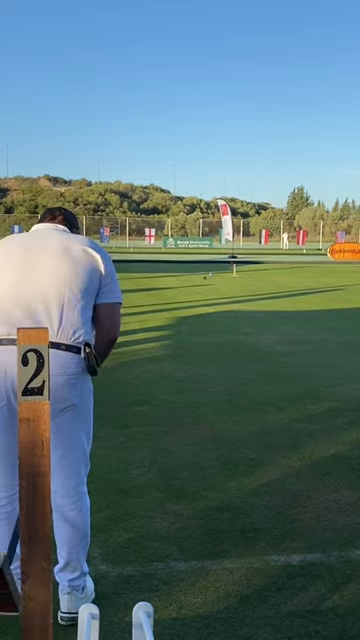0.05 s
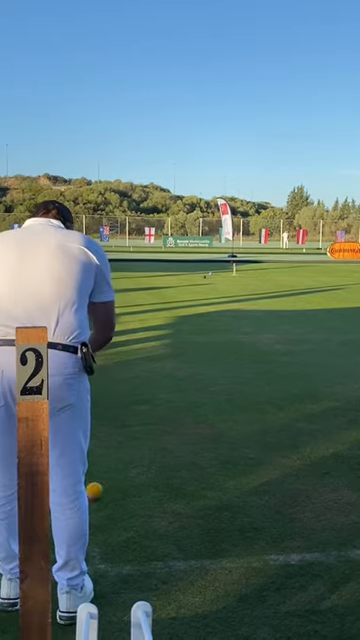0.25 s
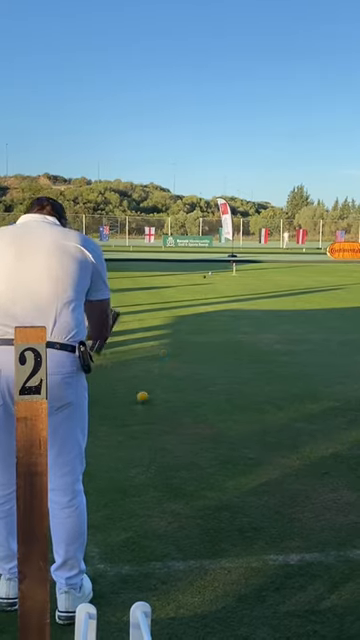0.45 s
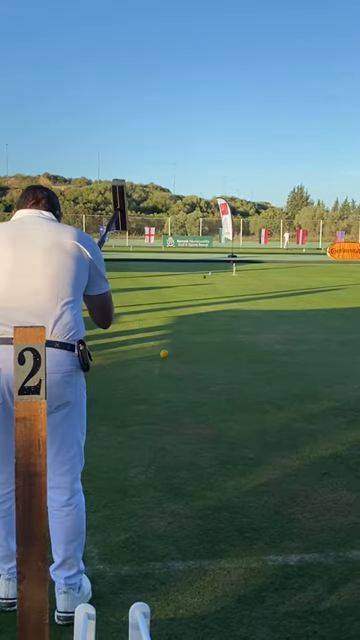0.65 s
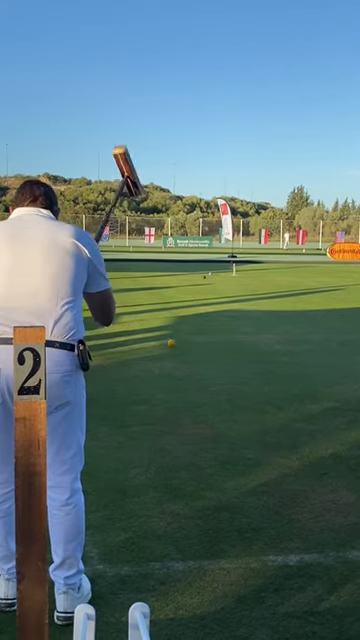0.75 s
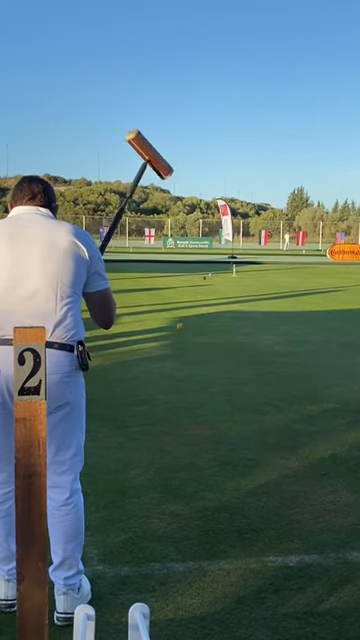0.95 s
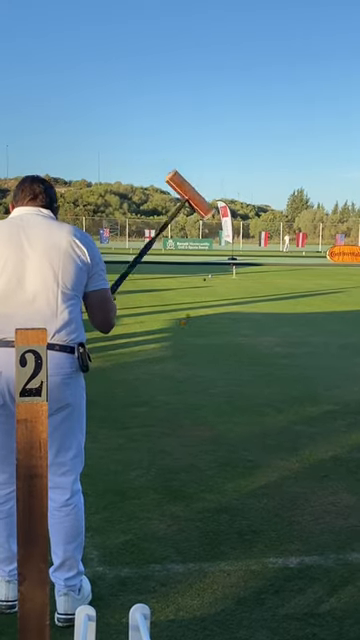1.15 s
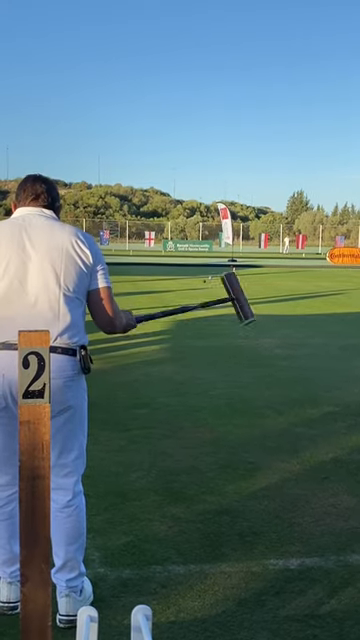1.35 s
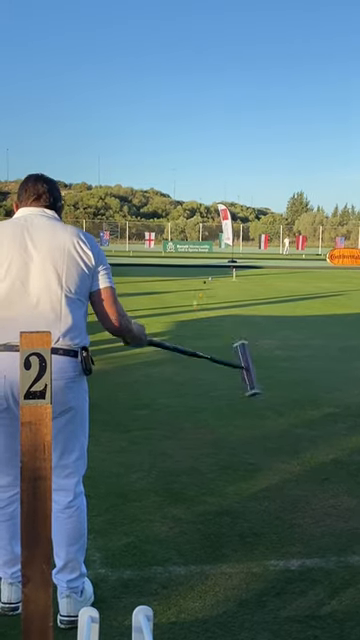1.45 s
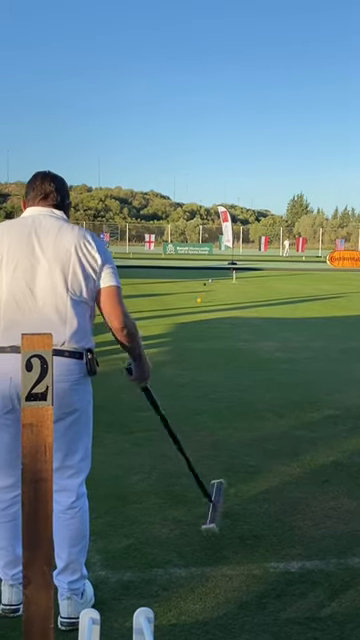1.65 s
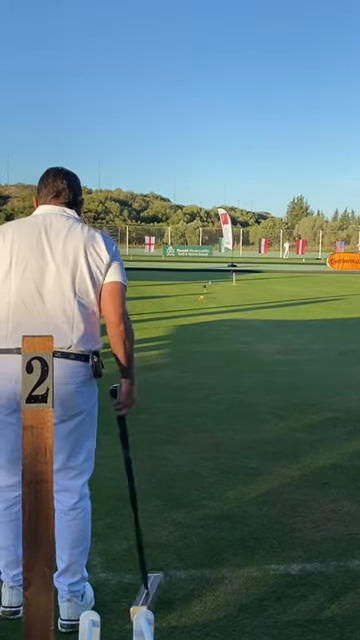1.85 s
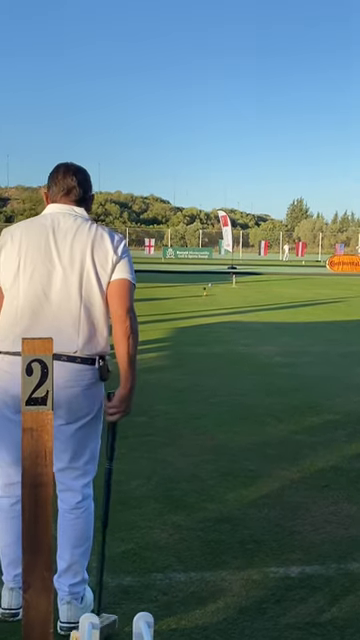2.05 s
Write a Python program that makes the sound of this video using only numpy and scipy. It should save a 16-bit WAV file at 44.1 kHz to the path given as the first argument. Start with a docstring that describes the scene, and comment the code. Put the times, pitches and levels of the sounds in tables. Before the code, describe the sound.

One sharp, woody mallet knock on a lawn over low breeze rumble, ending in a faint scrape.

```python
"""Low rumble and breeze run throughout, as octave bands of flickering noise with gusts.
A mallet cracks on a croquet ball: swelling modes, a burst of noise, slap echoes and a scattered tail.
The ball then skims off in brushes of grass noise and snapping stems; a bird chirps in scooped whistles.
Last, the mallet head drags on the turf: gritty scuffs, sliding hiss, narrow rings and more snaps.
A two-port microphone shifts the treble phase, ducks its gain after loud peaks and cuts the top."""
import sys
import numpy as np
from scipy import signal
from scipy.fft import rfft, irfft
from scipy.io import wavfile
from scipy.ndimage import uniform_filter1d

SR = 44100
rng = np.random.default_rng(int(sys.argv[2]) if len(sys.argv) > 2 else 0)


def dump(signal):
    """Clip the signal to [-1, 1] and save it as 16-bit WAV at the path in sys.argv[1]."""
    limited = np.clip(np.atleast_2d(signal).T, -1, 1)
    pcm = np.round(limited * 32767).astype(np.int16)
    wavfile.write(sys.argv[1], SR, pcm)


N = 92610


def amp(db):
    """Decibels to gain."""
    return 10 ** (np.asarray(db) / 20)


def rms_one(x):
    """Scale to unit rms."""
    return x / np.sqrt(np.mean(x ** 2) + 1e-20)


def at_hz(points, hz):
    """Interpolate a table on a log-frequency axis."""
    table_hz, values = np.transpose(points)
    return np.interp(np.log(hz), np.log(table_hz), values)


def since(start_s):
    """Seconds after a moment, zero before it."""
    return np.maximum(np.arange(N) / SR - start_s, 0)


def dying(start_s, t60_s):
    """Sudden start, exponential decay of 60 dB per t60_s."""
    t = since(start_s)
    return (t > 0) * amp(-60 * t / t60_s)


def swells(rows):
    """Sum of bell-shaped levels, each with its own rise and fall."""
    t = np.arange(N) / SR
    out = 0
    for peak_s, db, rise_s, fall_s in rows:
        width_s = np.where(t < peak_s, rise_s, fall_s)
        out = out + amp(db) * np.exp(-((t - peak_s) / width_s) ** 2)
    return out


def drift(corner_hz):
    """Slow random wander of spread 1: two-pole lowpassed noise, computed every 40 samples."""
    step = 40
    r = np.exp(-2 * np.pi * corner_hz * step / SR)
    white = rng.standard_normal(N // step + 2002)
    slow = signal.lfilter([1], [1, -2 * r, r * r], white)[2000:]  # skip the filter's settling
    return np.interp(np.arange(N) / step, np.arange(len(slow)), rms_one(slow))


# Left-right correlation of noise. Each row: frequency in Hz, correlation (1 = identical).
LIKENESS = [(60, 1), (130, 1), (250, 0.99), (450, .85), (800, 0.087), (1400, 0.58), (2500, 0.99),
            (4500, 0.95), (7000, 0.86), (15000, .93)]


def noise(spectrum, patchy_db):
    """Stereo noise in overlapping octave bands, each flickering by itself; rms 1."""
    hz = np.arange(N // 2 + 1) * SR / N + 1
    low_hz, high_hz = spectrum[0][0], spectrum[-1][0]
    inside = (hz > low_hz) & (hz < high_hz)
    mid, side = rfft(rng.standard_normal((2, N))) * amp(at_hz(spectrum, hz)) * inside
    alike = np.clip(at_hz(LIKENESS, hz), 0, 1)
    pair = np.sqrt(1 + alike) * mid + np.sqrt(1 - alike) * side * [[1], [-1]]
    out = 0
    for octave in np.arange(np.floor(np.log2(low_hz)), 15):
        band = np.clip(1 - np.abs(np.log2(hz) - octave), 0, 1)
        out = out + irfft(pair * band, N) * amp(patchy_db * drift(15))
    return rms_one(out)


def smear(hz, width_hz):
    """Bandpassed noise around a pitch, identical in both channels; rms 1."""
    edges_hz = [hz - width_hz / 2, hz + width_hz / 2]
    sos = signal.butter(2, edges_hz, "band", fs=SR, output="sos")
    return rms_one(signal.sosfilt(sos, rng.standard_normal(N)))


# Rumble and breeze colour. Each row: frequency in Hz, relative density in dB per Hz.
AIR_COLOUR = [(15, -57), (25, -31.5), (54, -6), (105, 0), (190, -12), (280, -21.5), (400, -16),
              (520, -16.5), (650, -22.5), (760, -28.5), (930, -31.5), (1150, -34), (2200, -52),
              (3300, -62.5), (5000, -66.5), (7400, -73.5), (10000, -73.5), (13000, -77), (15800, -90)]
# Rumble and breeze level. Each row: time in seconds, level in dB.
AIR_LEVEL = [(0, -37.5), (0.551, -38.5), (0.701, -39), (0.901, -37.5), (1.3, -39.5), (1.699, -38),
             (2.05, -36.5)]
# Gust colour, low middle. Each row: frequency in Hz, relative density in dB per Hz.
GUST_COLOUR = [(280, -7), (400, 1), (520, -1.5), (680, -9)]
# Gusts. Each row: peak time in seconds, level in dB, rise in seconds, fall in seconds.
GUSTS = [(.45, -58, .08, 0.14), (.92, -56.5, 0.13, 0.18), (1.86, -53.5, .04, 0.088)]


def air():
    """Far rumble and breeze as broadband noise of wandering level, plus swelling gusts."""
    level_db = np.interp(np.arange(N) / SR, *np.transpose(AIR_LEVEL))
    steady = amp(level_db) * noise(AIR_COLOUR, patchy_db=2.0)
    return steady + swells(GUSTS) * noise(GUST_COLOUR, patchy_db=1.0)


# Modes of mallet head and ball together.
# Each row: frequency in Hz, level in dB, time to peak in seconds, left over right in dB.
KNOCK_MODES = [(137, -22, 0.0048, 2.5), (270.8, -5, 0.0026, 1), (490, -21.5, 0.0042, 2.5),
               (835, -2.5, 0.0021, 2.5), (1176, -12.5, 0.0018, 3), (1468, -6.5, 0.0015, 3.5),
               (1946, -10, 0.0011, 2), (2970, -37.5, 0.0013, 1.5), (3670, -23, .0012, 0.5),
               (4640, -28.5, 0.0011, -4), (5687, -22, 0.0011, 1), (6560, -25, 0.0009, 2),
               (8490, -28, .001, 0.5), (10290, -28.5, 0.00054, 4.5), (11700, -31, 0.0006, 0),
               (14260, -36.5, .0007, 1)]
LAG_CYCLES = 0.96  # onset lag in the mode's own cycles: lower modes enter later
BRIGHT_FROM_HZ, BRIGHT_LAG_S = 3000, 0.00055  # extra onset lag of all modes above 3 kHz


def knock(start_s):
    """Each mode swells and dies on its own time scale, after its own lag."""
    out = 0
    for hz, db, peak_s, pan_db in KNOCK_MODES:
        lag_s = LAG_CYCLES / hz + BRIGHT_LAG_S * (hz > BRIGHT_FROM_HZ)
        t = since(start_s + lag_s)
        shape = (t / peak_s * np.exp(1 - t / peak_s)) ** 3
        sides = amp([[db + pan_db / 2], [db - pan_db / 2]])
        out = out + sides * shape * np.sin(2 * np.pi * hz * t)
    return out


HIT_S, HIT_DB = 0.2243, -1
# Slap echoes from fences and sheds. Each row: delay in seconds, level in dB, low cut in Hz.
SLAPS = [(.010, -29, 2500), (.021, -23, 3200), (.051, -43, 593), (0.118, -36, 900), (0.286, -42.5, 510)]


def blow():
    """The direct knock and its high-passed delayed copies."""
    out = knock(HIT_S)
    for delay_s, db, low_cut_hz in SLAPS:
        sos = signal.butter(2, low_cut_hz, "high", fs=SR, output="sos")
        out = out + signal.sosfilt(sos, amp(db) * knock(HIT_S + delay_s))
    return amp(HIT_DB) * out


# Bright noisy part of the crack, about 1 ms long, just after its start.
# Each row: peak time in seconds, level in dB, rise in seconds, fall in seconds.
CRACK_NOISE = [(.226, -32.5, 0.00082, 0.00055)]
# Crack noise colour. Each row: frequency in Hz, relative density in dB per Hz.
CRACK_NOISE_COLOUR = [(1000, -5.5), (2500, -13.5), (6000, -5), (9000, -6.5), (13000, -9), (15800, -15.5)]


def crack_noise():
    """The noisy part of the crack as a very short swell of bright noise."""
    return swells(CRACK_NOISE) * noise(CRACK_NOISE_COLOUR, patchy_db=1.5)


SCATTER_DB, SCATTER_T60_S = -34, 0.3
SCATTER_FAR_DB, SCATTER_FAR_T60_S = -46.5, 0.95
# Scatter colour. Each row: frequency in Hz, relative density in dB per Hz.
SCATTER_COLOUR = [(400, -29), (800, 0), (1200, -6), (2200, -10.5), (2950, -21.5), (3750, -16.5),
                  (4300, -19), (5600, -20.5), (7500, -28.5), (10000, -25.5), (13000, -30), (15800, -46.5)]
# Broad late returns from the hedge line.
# Each row: peak time in seconds, level in dB, rise in seconds, fall in seconds.
RETURNS = [(.238, -42.5, .008, .01), (.275, -45.5, .022, 0.011)]


def scatter():
    """Diffuse return of the crack: noise under a fast and a slow decay, plus hedge swells."""
    near = amp(SCATTER_DB) * dying(HIT_S, SCATTER_T60_S)
    far = amp(SCATTER_FAR_DB) * dying(HIT_S, SCATTER_FAR_T60_S)
    flicker = amp(1.2 * drift(150))
    return (near + far + swells(RETURNS)) * flicker * noise(SCATTER_COLOUR, patchy_db=3.5)


# Ball brushing the grass.
# Each row: peak time in seconds, level in dB, rise in seconds, fall in seconds.
HOPS = [(.39, -56.5, 0.022, 0.012), (.442, -59, .006, .01), (.458, -56, .008, 0.0089),
        (.511, -53.5, 0.015, 0.011), (.53, -69, 0.029, .014), (.6, -65, 0.015, 0.012),
        (.42, -67, 0.036, 0.041), (.765, -72.5, 0.016, .014)]
# Grass colour. Each row: frequency in Hz, relative density in dB per Hz.
GRASS_COLOUR = [(900, -27.5), (1500, -19), (2700, -3), (4800, 2), (6000, -4), (7500, -8.5), (10700, -6.5),
                (13500, -10), (15800, -15)]


def ball_hops():
    """Each brush is a short flickering swell of bright noise."""
    return swells(HOPS) * amp(2.0 * drift(200)) * noise(GRASS_COLOUR, patchy_db=-1.0)


# Stems under ball and mallet head. Each row: start in seconds, level in dB, pitch in Hz.
STEMS = [(.457, -42.5, 5060), (0.507, -43, 5600), (.5145, -52, 4100), (.516, -40, 3200), (.534, -46, 3200),
         (.609, -60, 4900), (1.557, -63.5, 11000), (1.572, -62, 4700), (1.693, -57, 2300),
         (1.717, -53, 2440), (1.748, -51.5, 2880), (1.851, -45.5, 2800), (1.861, -41.5, 1280),
         (1.862, -52, 2470), (1.872, -39, 2780), (1.876, -43.5, 1400), (1.876, -55, 4700),
         (1.892, -50, 5200), (1.896, -47, 2300), (1.9, -48, 1360), (1.912, -44, 2680), (1.929, -48, 2480),
         (1.853, -49, 5000), (1.884, -50, 3300), (1.947, -56, 4770), (1.952, -61, 2700), (1.999, -60, 3500),
         (2.004, -55.5, 2600), (2.037, -64, 6000)]
STEM_T60_CYCLES = 18


def stem_snaps():
    """Each stem rings as a sine that loses 60 dB in a fixed count of cycles."""
    out = 0
    for start_s, db, hz in STEMS:
        ring = np.sin(2 * np.pi * hz * since(start_s))
        out = out + amp(db) * dying(start_s, STEM_T60_CYCLES / hz) * ring
    return out


# Chirps. Each row: start in seconds, level in dB, whistle offset from it in dB,
# initial drop below pitch in Hz.
CHIRPS = [(.465, -65, -1, 98.7), (.49, -68, -3, 100), (1.025, -75, 1, 400), (1.044, -66, 0.5, 501),
          (1.539, -76, -16, 100), (1.676, -72.5, -7, 593), (1.692, -66, -1.5, 149.5)]
CHIRP_HZ, CHIRP_SCOOP_S, CHIRP_S, CHIRP_ROUGH_DB = 4680, 0.007, 0.032, 3.5
CHIRP_ECHO_DB, CHIRP_ECHO_T60_S, CHIRP_ECHO_WIDTH_HZ = -4, 0.38, 280
CHIRP_RASP_DB, CHIRP_RASP_WIDTH_HZ = -3, 1700  # wide hoarse halo, relative to the narrow echo


def bird():
    """A whistle scoops up to its pitch; narrow and wide noise bands hang on as its echo."""
    hang = smear(CHIRP_HZ, CHIRP_ECHO_WIDTH_HZ)
    hang = hang + amp(CHIRP_RASP_DB) * smear(CHIRP_HZ, CHIRP_RASP_WIDTH_HZ)
    out = 0
    for start_s, db, clear_db, scoop_hz in CHIRPS:
        t = since(start_s)
        progress = np.minimum(t / CHIRP_S, 1)
        hz = CHIRP_HZ - scoop_hz * np.exp(-t / CHIRP_SCOOP_S)
        note = np.sin(np.pi * progress) * np.sin(2 * np.pi * np.cumsum(hz) / SR)
        whistle = amp(db + clear_db + CHIRP_ROUGH_DB * drift(90)) * note
        echo = amp(db + CHIRP_ECHO_DB) * dying(start_s, CHIRP_ECHO_T60_S) * progress
        out = out + whistle + echo * hang
    return out


GRIT_PER_S, GRIT_SPREAD_DB, GRIT_SHARE = 700, 3.5, 0.5


def gritty(rows):
    """Brush envelope roughened by sparse uneven grains: blades snapping and grit."""
    hits = rng.random(N) < GRIT_PER_S / SR
    grains = hits * amp(GRIT_SPREAD_DB * np.minimum(rng.exponential(1, N), 4))
    grains = rms_one(uniform_filter1d(grains, size=80))  # about 2 ms each
    return swells(rows) * (1 - GRIT_SHARE + GRIT_SHARE * grains)


# Mallet head and shoes scuffing the turf.
# Each row: peak time in seconds, level in dB, rise in seconds, fall in seconds.
SCUFFS = [(1.556, -69, .004, 0.0092), (1.72, -70, 0.023, 0.054), (1.75, -71, 0.016, 0.011),
          (1.852, -55.5, 0.022, 0.012), (1.878, -50.5, 0.02, 0.026), (1.92, -60, 0.012, 0.045),
          (1.985, -65, 0.024, 0.066)]
# Turf colour. Each row: frequency in Hz, relative density in dB per Hz.
TURF_COLOUR = [(200, -4.5), (400, -16), (750, -3), (1000, -13), (1300, -1.5), (1900, -10.5), (2500, -3.5),
               (2850, -9), (3200, -6.5), (3900, -22), (4750, -22), (5500, -23), (7400, -28.5), (10000, -28),
               (13000, -28), (15800, -34)]


def turf_scuffs():
    """Scuffs as noise in the turf colour under gritty swells."""
    return gritty(SCUFFS) * noise(TURF_COLOUR, patchy_db=-0.5)


# Narrow rings of the dragged head. Each row: pitch in Hz, width in Hz, list of swells;
# each swell: peak time in seconds, level in dB, rise in seconds, fall in seconds.
DRAG_RINGS = [(2430, 300, [(1.72, -66, 0.04, 0.043), (1.87, -61.5, .025, 0.065), (1.96, -66, 0.014, 0.021),
              (2.01, -67.5, 0.0061, 0.022)]), (1038, 90, [(1.93, -56.5, 0.038, 0.028)]),
              (4650, 1200, [(1.86, -62.5, 0.014, 0.036), (1.96, -77, .015, 0.046)])]


def drag_rings():
    """The dragged head rings as swelling narrow bands of noise."""
    return sum(swells(rows) * smear(hz, width_hz) for hz, width_hz, rows in DRAG_RINGS)


# Grass sliding under the head.
# Each row: peak time in seconds, level in dB, rise in seconds, fall in seconds.
SLIDES = [(1.73, -76, .03, 0.027), (1.88, -62, 0.016, 0.022), (1.96, -74, 0.046, 0.065),
          (2.03, -87, 0.013, .03)]


def grass_slides():
    """Broad bright hiss in the grass colour under gritty swells."""
    return gritty(SLIDES) * noise(GRASS_COLOUR, patchy_db=3.0)


def scene():
    """Sum of all sources, in stereo."""
    crack = blow() + crack_noise() + scatter()
    ball = ball_hops() + stem_snaps()
    drag = turf_scuffs() + drag_rings() + grass_slides()
    return air() + crack + ball + bird() + drag


# Left port's lead over the right. Each row: frequency in Hz, phase in radians.
PORT_LEAD = [(300, 0), (1600, .35), (4600, .6), (7400, 3.14), (10300, 6.28), (13600, 9.42), (16300, 12.4)]


def two_ports(dry):
    """Delay the right channel's phase by a frequency-dependent angle."""
    lead_rad = np.interp(np.arange(N // 2 + 1) * SR / N, *np.transpose(PORT_LEAD))
    right = irfft(rfft(dry[1]) * np.exp(-1j * lead_rad), N)
    return np.stack([dry[0], right])


DUCK_FROM_DB, DUCK_SHARE = -19, 0.63  # threshold; dB of cut per dB over
DUCK_RECOVER_DB_PER_S, DUCK_ATTACK_S = 53.5, 0.0052


def duck(x):
    """Peaks over a threshold cut the gain; the cut recovers linearly in dB, then is smoothed."""
    peak_db = 20 * np.log10(np.abs(x).max(axis=0) + 1e-9)
    over_db = np.maximum(peak_db - DUCK_FROM_DB, 0)
    ramp_db = DUCK_RECOVER_DB_PER_S * np.arange(N) / SR
    cut_db = np.maximum.accumulate(DUCK_SHARE * over_db + ramp_db) - ramp_db
    r = np.exp(-1 / (DUCK_ATTACK_S * SR))
    return x * amp(-signal.lfilter([1 - r], [1, -r], cut_db))


STOP_HZ, STOP_DB = 16600, 70


def record(dry):
    """Port phase, gain ducking, then a steep lowpass."""
    x = duck(two_ports(dry))
    return signal.sosfilt(signal.cheby2(12, STOP_DB, STOP_HZ, fs=SR, output="sos"), x)


dry = scene()
out = record(dry)
dump(out)
```